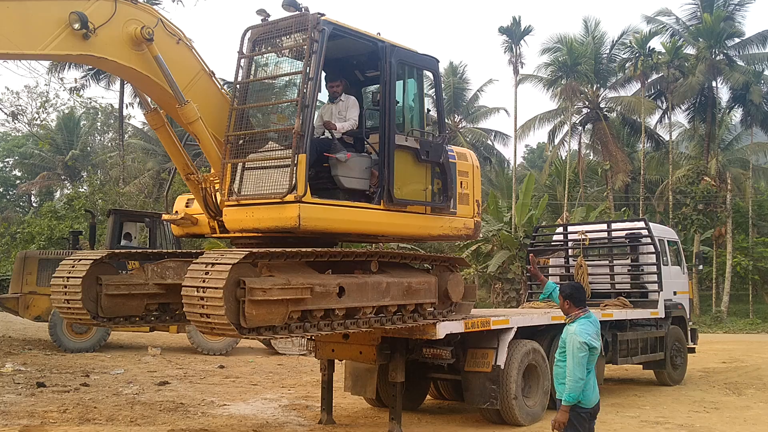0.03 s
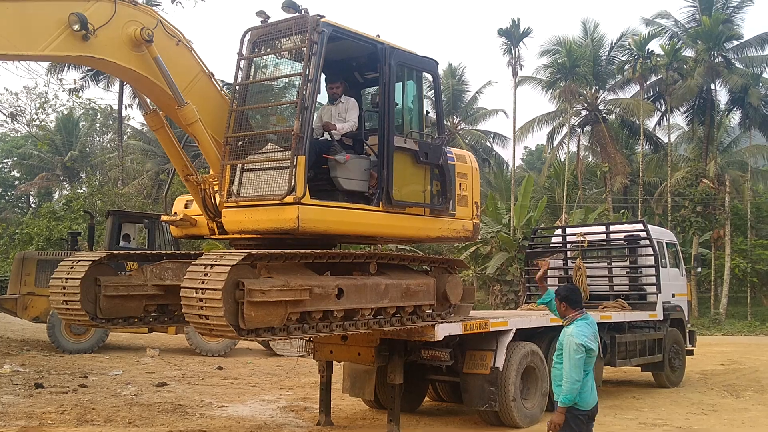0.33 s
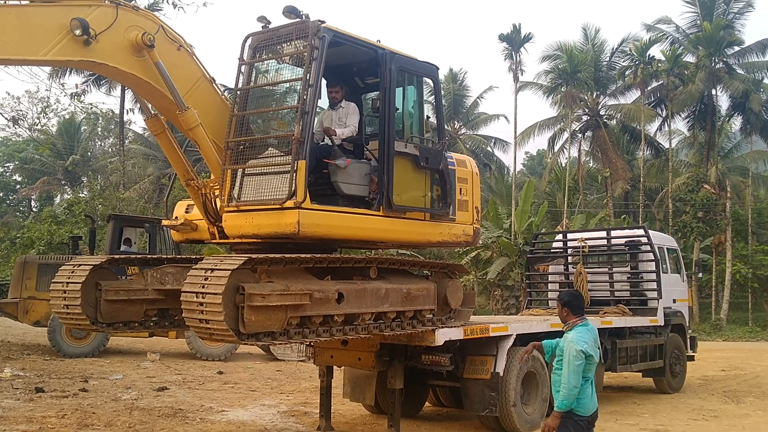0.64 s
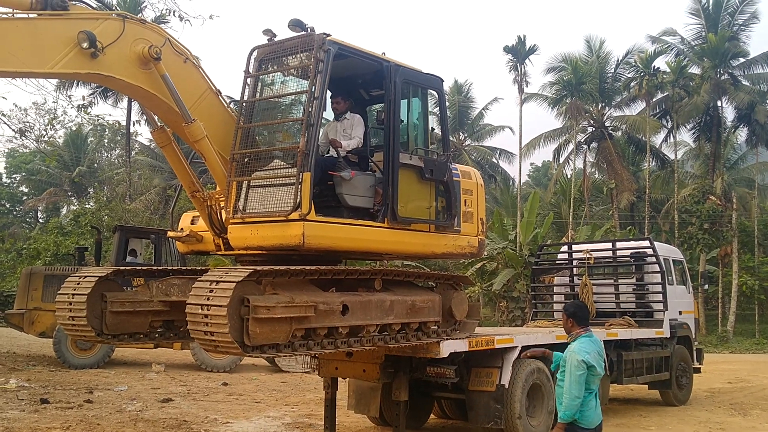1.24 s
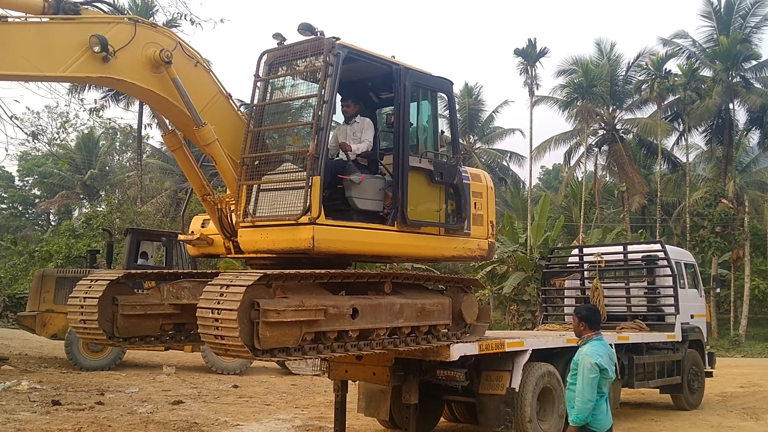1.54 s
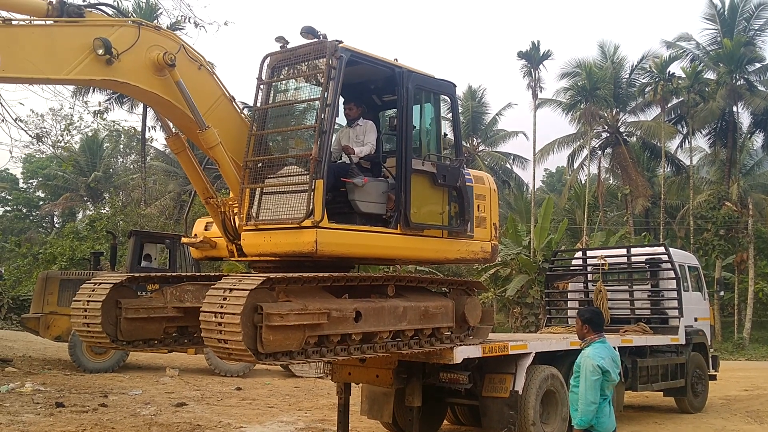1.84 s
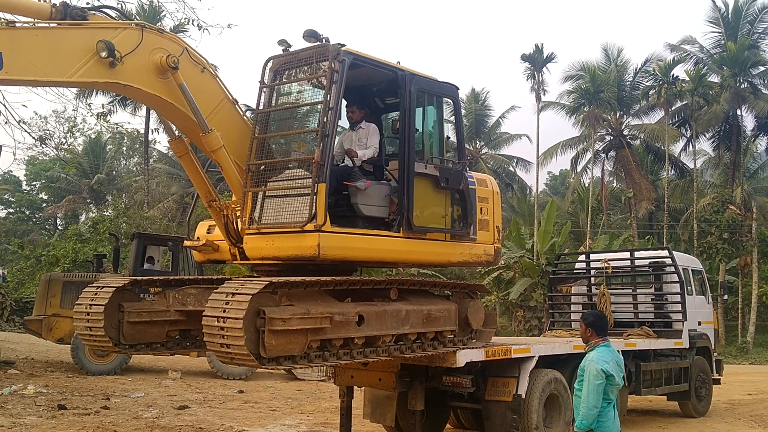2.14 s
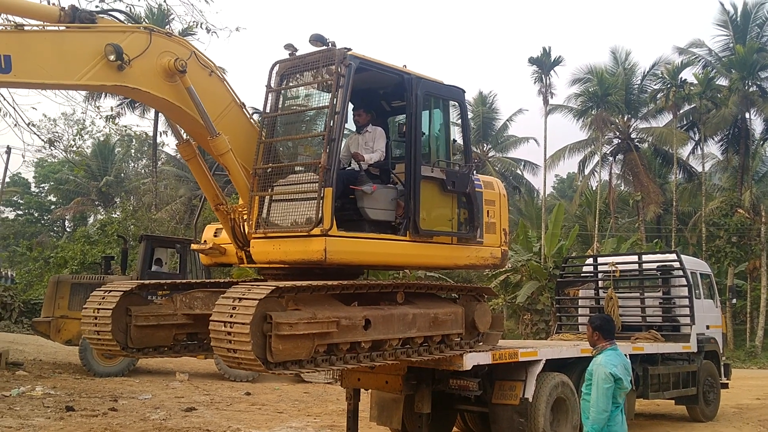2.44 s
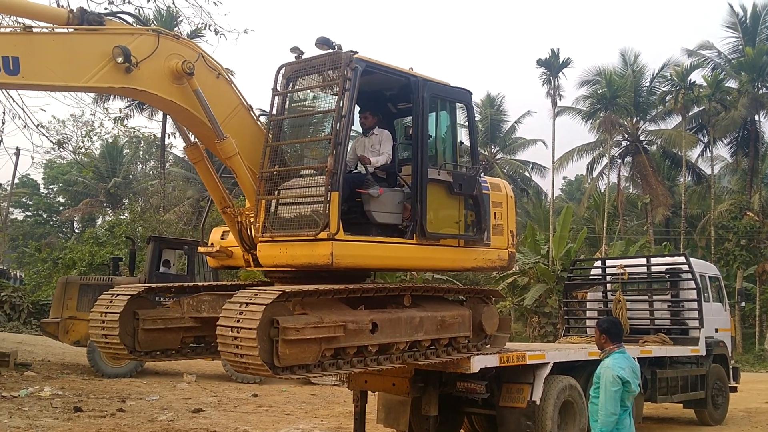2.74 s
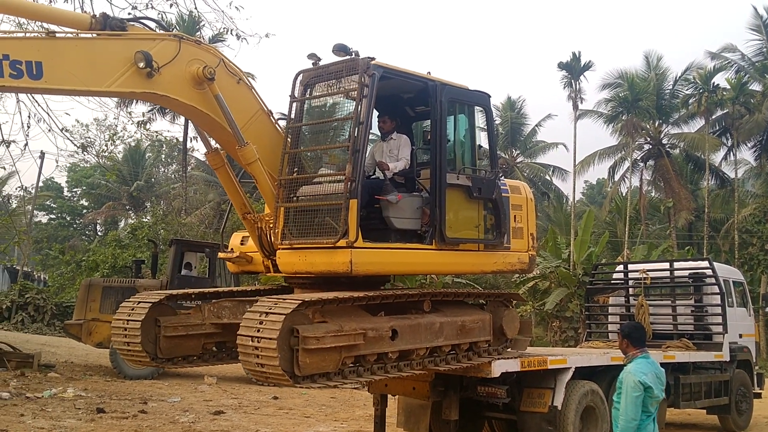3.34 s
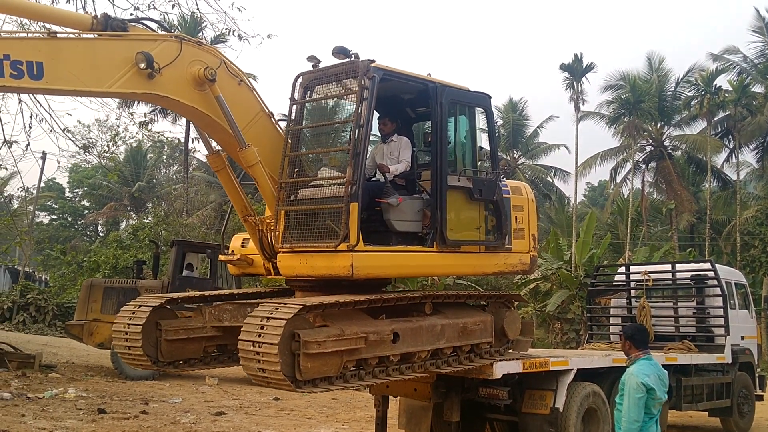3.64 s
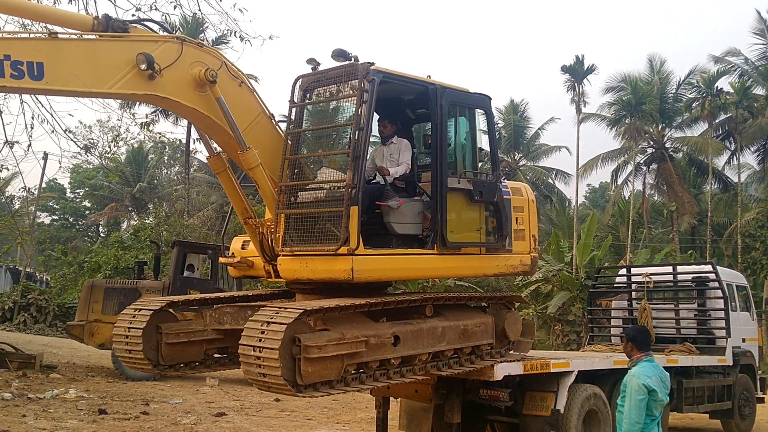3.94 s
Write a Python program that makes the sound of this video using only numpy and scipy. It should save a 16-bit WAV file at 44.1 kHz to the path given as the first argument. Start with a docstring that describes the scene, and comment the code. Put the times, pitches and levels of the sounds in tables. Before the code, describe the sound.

A diesel excavator engine runs steadily, with one sharp steel knock and two soft clunks.

```python
"""The sound cuts in and swells: a four-cylinder diesel excavator runs on a truck bed in an open yard.
Each firing gives a sharp tick, clatter from the engine block and an exhaust thump. A fan rushes, gears
whine, machinery hums, a slower diesel idles nearby and a loose panel rings once per engine cycle.
At 1.7 seconds steel knocks once. Near 2.9 seconds, as the engine speed wavers, the track clunks twice;
then oil hisses briefly through a hydraulic valve while the engine runs on."""
import sys
import numpy as np
from scipy import signal
from scipy.fft import rfft, irfft
from scipy.io import wavfile

SR = 44100
rng = np.random.default_rng(int(sys.argv[2]) if len(sys.argv) > 2 else 0)


def digitize_waveform(pressure):
    """Quantize a signal to 16-bit integers and store it at the path in sys.argv[1].

    Rows of a 2-D input are taken as channels; values are limited to [-1, 1].
    """
    field = np.atleast_2d(pressure).T
    bounded = np.clip(field, -1, 1)
    quanta = np.round(bounded * 32767).astype(np.int16)
    wavfile.write(sys.argv[1], SR, quanta)


N = 176400

# Engine speed. Each row: time in seconds, firings per second.
SPEED = [(0, 39.65), (2.1, 39.65), (2.5, 39.52), (2.65, 39.65), (2.85, 40.5), (3.03, 39.65), (3.45, 39.24),
         (3.68, 39.65), (3.85, 39.85), (4, 39.65)]
# The four cylinders. Each row: strength of the thump, the clatter and the tick, all in dB.
CYLINDERS = [(-0.5, -5, -4), (-4, -6.3, -9), (-0.8, -3, -4), (-3, -6.16, -2.4)]
# Tone colours of the noisy sounds. Each row: frequency in Hz, relative strength in dB.
PIPE_COLOUR = [(15, 2.5), (39.6, 1.5), (79, -6), (119, -5), (158, -10.5), (198, -11), (240, -27),
               (280, -21), (318, -19.5), (357, -22.5), (410, -27), (900, -65)]
BLOCK_COLOUR = [(30, -17.5), (60, -7.5), (88, -0.5), (130, 1), (195, 5.5), (270, 0), (350, 2), (430, -4),
                (620, -3), (930, -3), (1100, -0.5), (1600, -4.5), (2300, -4.5), (2650, -10), (3100, -18.5),
                (3800, -25.5), (6000, -35), (16000, -52)]
TICK_COLOUR = [(1500, -38), (3200, -9), (4600, -5.5), (5300, -7.5), (6300, -6), (7400, -0.5), (8100, -4.5),
               (8800, -15), (11500, -12.5), (13200, -2), (15600, 5), (16500, -0.5)]
FAN_COLOUR = [(300, -3.5), (1500, 1.5), (2500, -4), (3200, -4.5), (4600, -6.5), (5400, -12.5), (7500, -9),
              (8800, -15.5), (12000, -12), (16000, -13)]
HISS_COLOUR = [(1000, -56), (2800, 6), (4500, 3.5), (5600, -12), (7600, 3), (9000, -12), (12000, -11),
               (16000, -24)]
# Where the engine block rings. Each row: pitch in Hz, width in Hz, boost in dB.
BLOCK_PEAKS = [(500, 65, 6.5), (684, 8.8, 4.5), (850, 57, 2.5), (1160, 26, 2), (1417, 27, 3.5),
               (1750, 44, 0.5), (1866, 38.4, 9.5), (2113, 44, 3.5)]
# The clatter grows as the hydraulics take load. Each row: time in seconds, gain in dB.
LOAD = [(0, -0.14), (2.4, 0.18), (3.2, .5), (4, 1.1)]
# How the whine, the hiss and the whole sound rise and fall. Each row: time in seconds, level in dB.
WHINE_LEVEL = [(.2, -43), (.8, -39), (1.4, -37), (2.5, -40.5), (2.9, -43), (4, -44)]
HISS_LEVEL = [(2.95, -68), (3.04, -43), (3.12, -40), (3.19, -46), (3.3, -49), (3.45, -70)]
SWELL = [(.224, -12.5), (.39, -5), (.5, -4.5), (.75, -3), (1.1, -1.6), (1.5, -1), (2, 0), (2.7, .5),
         (3.3, .4), (4, 0)]
# Machinery hums. Each row: pitch in Hz, level in dB.
HUMS = [(70.9, -35.5), (228, -51), (265.5, -44), (356.5, -46.5)]
# The second diesel's tones. Each row: multiple of its firing rate, level in dB.
IDLE_TONES = [(1, -34.5), (3, -43)]
# Hard panel rings, the knock with its bounces, track clunks. Each row: start in seconds, level in dB.
HARD_RINGS = [(1.628, -23), (2.032, -28), (2.134, -24), (2.538, -23.5), (2.74, -24)]
KNOCKS = [(1.7314, -20), (1.7347, -14), (1.737, -28), (1.7402, -10), (1.7578, -26)]
CLUNKS = [(2.843, -26), (2.942, -21.5)]
# Tones of the struck steel and the track. Each row: pitch in Hz, level in dB, seconds to fade by 60 dB.
STEEL_TONES = [(680, -10, 0.033), (1030, -7.5, 0.035), (1300, -10.5, 0.022), (1570, -5.5, 0.022),
               (1910, -7, 0.018), (2280, -4, 0.028), (2540, -10.5, 0.016), (3080, -15, 0.029),
               (3720, -21, .015), (4400, -19.5, .015)]
TRACK_TONES = [(345, -8, .06), (440, -1, 0.096), (566, 1, 0.045), (765, -14, .04)]


def amp(db):
    """Turns decibels into a gain."""
    return 10 ** (np.asarray(db) / 20)


def unit(x):
    """Scales a signal to an average (rms) size of 1."""
    return x / np.sqrt(np.mean(x ** 2) + 1e-20)


def clock():
    """The time of each sample in seconds."""
    return np.arange(N) / SR


def curve(points):
    """Joins (time, value) points with straight lines."""
    return np.interp(clock(), *np.transpose(points))


def add(mix, start_s, sound):
    """Mixes a sound in at its start time."""
    part = mix[max(round(start_s * SR), 0):][:len(sound)]
    part += sound[:len(part)]


def colour(x, points, peaks=()):
    """Gives a signal a tone colour and ringing peaks, then scales it to size 1."""
    size = 2 ** 14
    hz = abs(np.fft.fftfreq(size, 1 / SR))
    point_hz, point_db = np.transpose(points)
    db = np.interp(np.log(hz + 1), np.log(point_hz + 1), point_db)
    db += sum(boost / (1 + (2 * (hz - pitch) / width) ** 2) for pitch, width, boost in peaks)
    spectrum = np.exp(np.conj(signal.hilbert(np.log(amp(db)))))  # rings after a hit, never before
    response = np.fft.ifft(spectrum).real[:size // 2]
    return unit(signal.fftconvolve(x, response)[:N])


def drift(rate_hz):
    """A slow random wander of size 1."""
    keep_slow = np.exp(-(np.fft.rfftfreq(N, 1 / SR) / rate_hz) ** 2)
    return unit(irfft(rfft(rng.standard_normal(N)) * keep_slow, N))


def firings(lag_s, first_s=0.0348):
    """A smooth count that passes a whole number about lag_s after each firing."""
    speed = curve(SPEED)
    return np.cumsum(speed) / SR - (first_s + lag_s) * speed[0]


def cylinder_gain(count, column):
    """The strength of the cylinder now firing."""
    return amp(np.array(CYLINDERS)[np.floor(count).astype(int) % len(CYLINDERS), column])


def bursts(count, rise_s, decay_s, spread_db):
    """A rise and a fade at each firing, each a little different in strength."""
    age = count % 1 / curve(SPEED)
    strength = amp(spread_db * rng.standard_normal(N)[np.floor(count).astype(int)])
    return strength * np.minimum(age / rise_s, 1) * np.exp(-np.maximum(age - rise_s, 0) / decay_s)


def ticks(floor=0.19):
    """A bright spit of noise comes just ahead of each thump."""
    count = firings(lag_s=-0.001)
    spits = cylinder_gain(count, column=2) * bursts(count, rise_s=0.003, decay_s=0.0083, spread_db=0.8)
    return amp(-39) * colour((floor + spits) * rng.standard_normal(N), TICK_COLOUR)


def clatter(floor=0.78, grain_db=2, bass_repeat=0.57, treble_repeat=0.4):
    """Tiny impacts ring the block after each firing; some repeat every cycle, the heavy ones most."""
    count = firings(lag_s=0.0055)
    impacts = rng.standard_normal((2, N)) * amp(grain_db * np.minimum(rng.exponential(1, (2, N)), 3))
    impacts *= rng.random((2, N)) < 0.2
    cycle_samples = round(len(CYLINDERS) * SR / SPEED[0][1])
    place_in_cycle = (count / len(CYLINDERS) % 1 * cycle_samples).astype(int)
    pair = np.array([unit(impacts[0][place_in_cycle]), unit(impacts[1])])  # repeating, always new
    bass = signal.sosfiltfilt(signal.butter(2, 250, fs=SR, output="sos"), pair)
    rattle = np.sqrt([bass_repeat, 1 - bass_repeat]) @ bass
    rattle += np.sqrt([treble_repeat, 1 - treble_repeat]) @ (pair - bass)
    surges = cylinder_gain(count, column=1) * bursts(count, rise_s=0.0026, decay_s=0.012, spread_db=0.2)
    return amp(-25.5 + curve(LOAD)) * colour(rattle * (floor + surges), BLOCK_COLOUR, BLOCK_PEAKS)


def exhaust(spread_db=0.35, low_cut_hz=24.3):
    """Each firing sends a puff down the pipe; the silencer booms at four times the firing rate."""
    count = firings(lag_s=0.0074)
    puffs = np.diff(np.floor(count), prepend=np.floor(count[0])) * cylinder_gain(count, column=0)
    thumps = colour(puffs * amp(spread_db * rng.standard_normal(N)), PIPE_COLOUR)
    thumps = signal.sosfiltfilt(signal.butter(4, low_cut_hz, "high", fs=SR, output="sos"), thumps)
    boom = amp(drift(rate_hz=13)) * np.cos(2 * np.pi * 4 * firings(lag_s=0))
    return amp(-34) * unit(boom) - amp(-26) * unit(thumps)


def fan():
    """Air rushes steadily through the radiator."""
    return amp(-41.5) * colour(rng.standard_normal(N), FAN_COLOUR)


def gear_whine(teeth_per_firing=46, wander_hz=2):
    """Gear teeth meet and make a thin tone that follows the engine speed."""
    hz = teeth_per_firing * curve(SPEED) + wander_hz * drift(rate_hz=4.55)
    return amp(curve(WHINE_LEVEL)) * unit(np.sin(2 * np.pi * np.cumsum(hz) / SR))


def hums(wander_hz=0.32):
    """The machinery hums low notes that waver slightly in pitch."""
    out = np.zeros(N)
    for hz, db in HUMS:
        pitch = hz + wander_hz * drift(rate_hz=3.8)
        out += amp(db) * np.sin(2 * np.pi * np.cumsum(pitch) / SR)
    return np.sqrt(2) * out


def second_diesel(firing_hz=35.8):
    """A slower engine's firings blend into an even throb."""
    phase = 2 * np.pi * firing_hz * clock()
    return -np.sqrt(2) * sum(amp(db) * np.cos(round(multiple) * phase) for multiple, db in IDLE_TONES)


def panel(pitch_hz=844.4, rise_s=0.0083, decay_s=0.0092):
    """A loose panel rings once every four firings, now and then harder."""
    out, t = np.zeros(N), np.arange(SR // 10) / SR
    cycles = np.floor(firings(lag_s=0.082) / len(CYLINDERS))
    starts = np.flatnonzero(np.diff(cycles)) / SR
    levels_db = rng.normal(-30.5, 2, len(starts))
    soft_rings = [(start, db) for start, db in zip(starts, levels_db)
                  if all(abs(start - hard) > t[-1] / 2 for hard, _ in HARD_RINGS)]
    shape = (1 - np.exp(-t / rise_s)) * np.exp(-t / decay_s)
    for start, db in soft_rings + list(HARD_RINGS):
        hz = pitch_hz * rng.normal(1, 0.013)
        add(out, start, amp(db) * shape / shape.max() * np.sin(2 * np.pi * hz * t))
    return out


def struck_steel(blows, tones, rise_s=0.00036, detune=0.035):
    """Each blow rings the tones of a steel part, a little differently each time."""
    out, t = np.zeros(N), np.arange(SR // 10) / SR
    for start, blow_db in blows:
        ring = np.zeros(len(t))
        for hz, db, fade_s in tones:
            wave = np.sin(2 * np.pi * (hz * rng.normal(1, detune) * t + rng.random()))
            ring += amp(db - 60 * t / fade_s) * wave
        add(out, start, amp(blow_db) * (1 - np.exp(-t / rise_s)) * ring)
    return out


def hydraulics():
    """Oil hisses briefly through a valve."""
    return amp(curve(HISS_LEVEL)) * colour(rng.standard_normal(N), HISS_COLOUR)


def scene():
    """All the sounds, heard from one spot in the open."""
    engine = exhaust() + clatter() + ticks() + fan() + gear_whine() + panel()
    running = engine + hums() + second_diesel()
    knock = struck_steel(KNOCKS, STEEL_TONES)
    track = struck_steel(CLUNKS, TRACK_TONES)
    return (running + knock + track + hydraulics())[None]


def record(dry, start_s=0.224, top_hz=15850):
    """The sound cuts in and swells, with the very highest treble taken off."""
    swelling = dry * amp(curve(SWELL)) * (clock() >= start_s)
    treble_cut = signal.firwin(511, top_hz, window=("kaiser", 9), fs=SR)
    return signal.oaconvolve(swelling, treble_cut[None], "same")


dry = scene()
out = record(dry)
digitize_waveform(out)
```